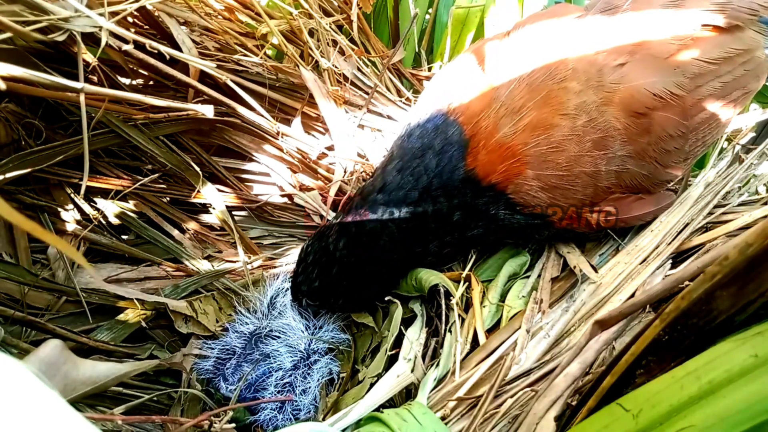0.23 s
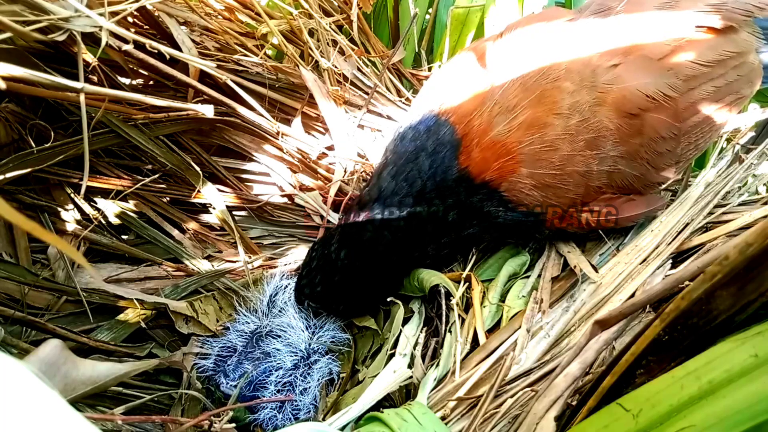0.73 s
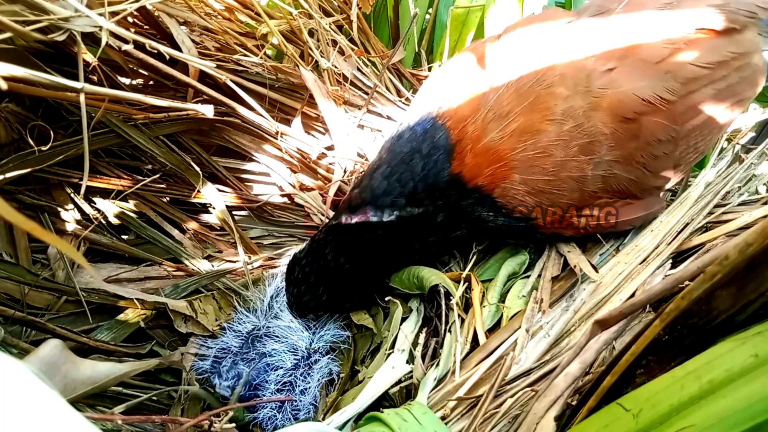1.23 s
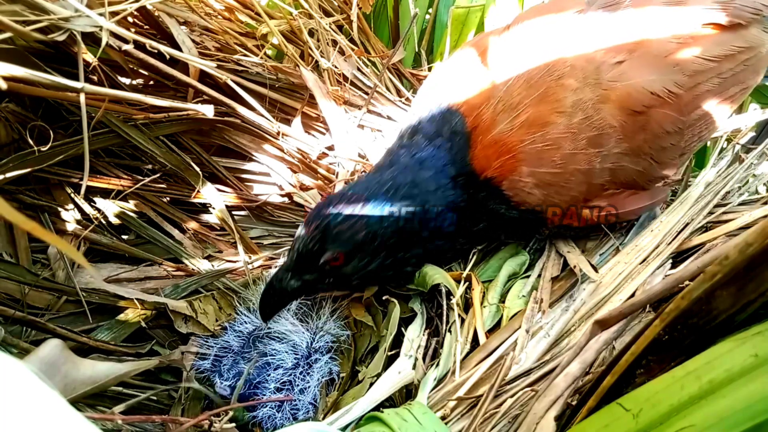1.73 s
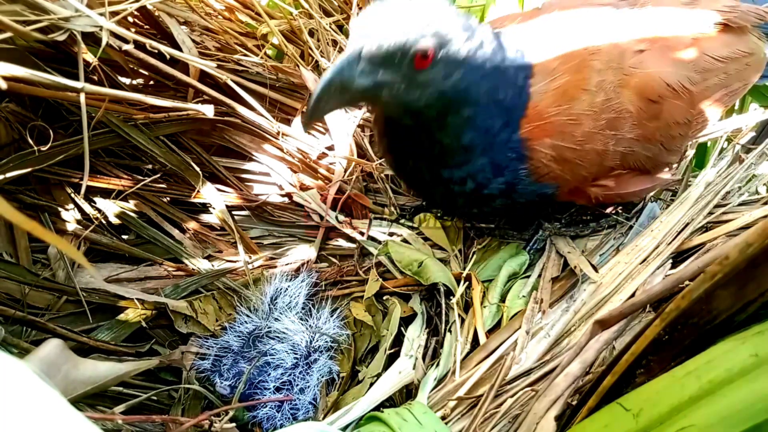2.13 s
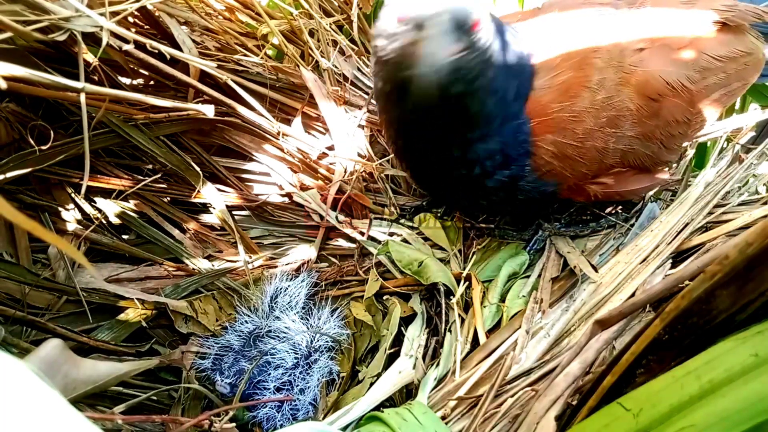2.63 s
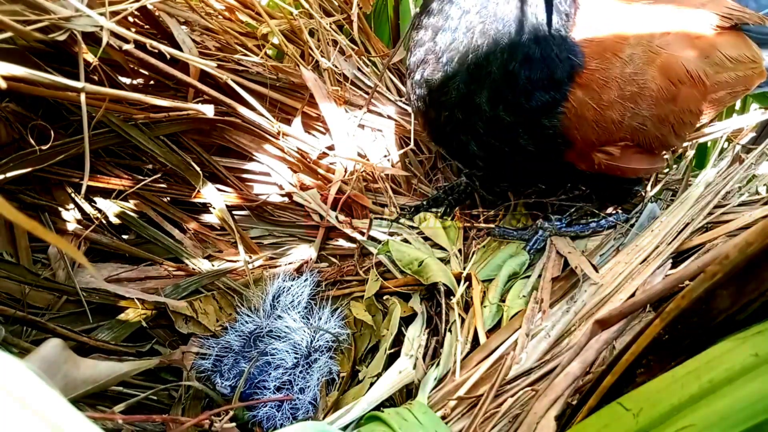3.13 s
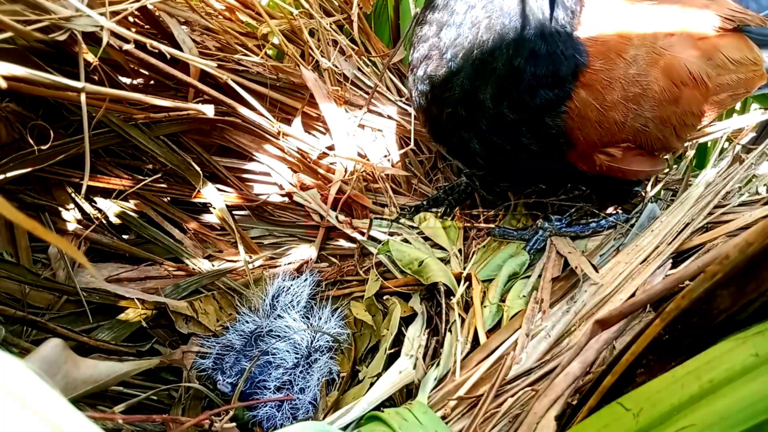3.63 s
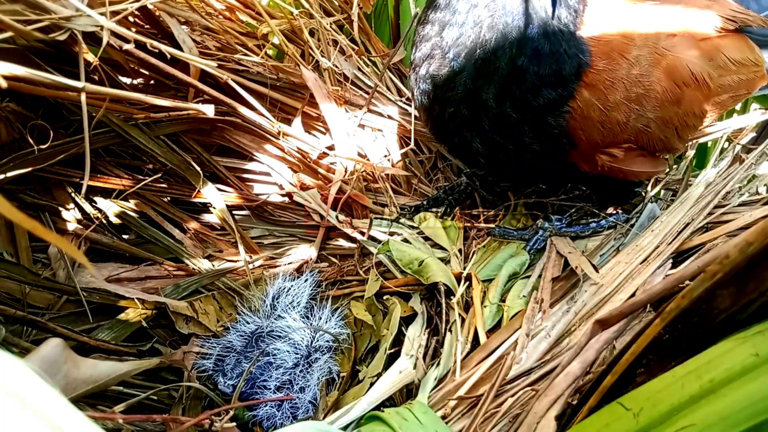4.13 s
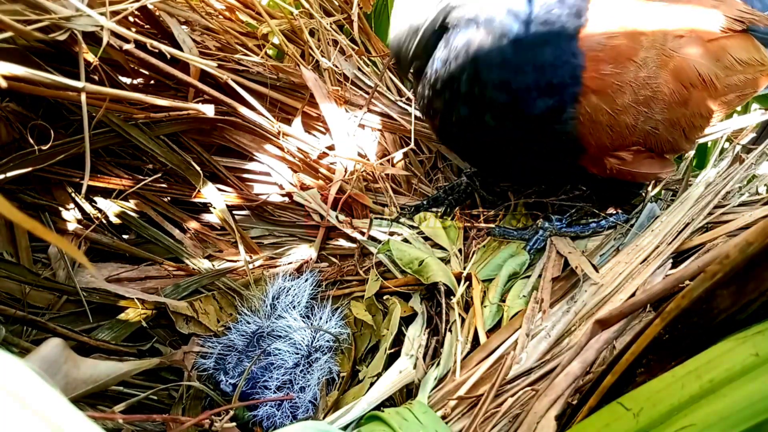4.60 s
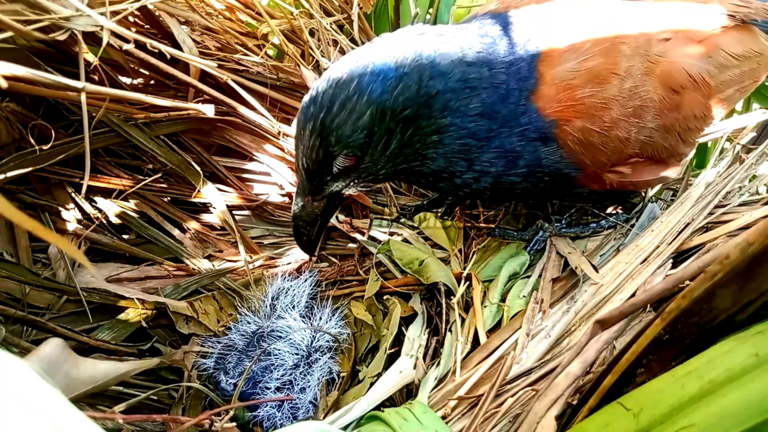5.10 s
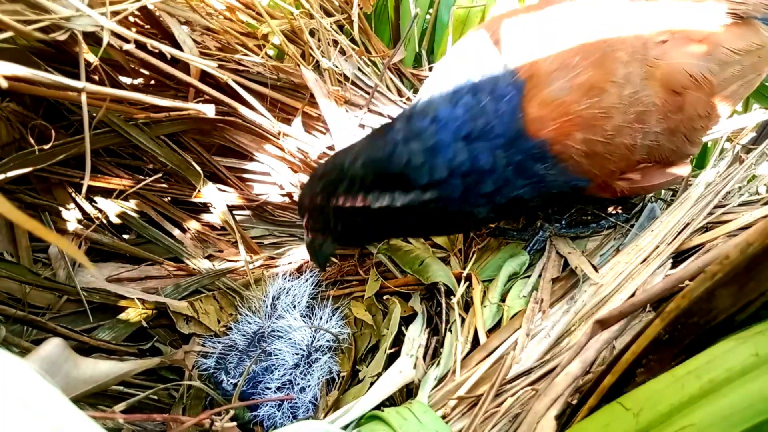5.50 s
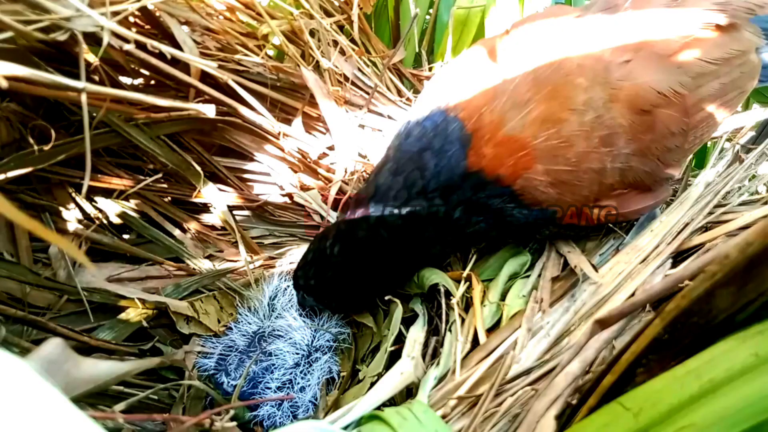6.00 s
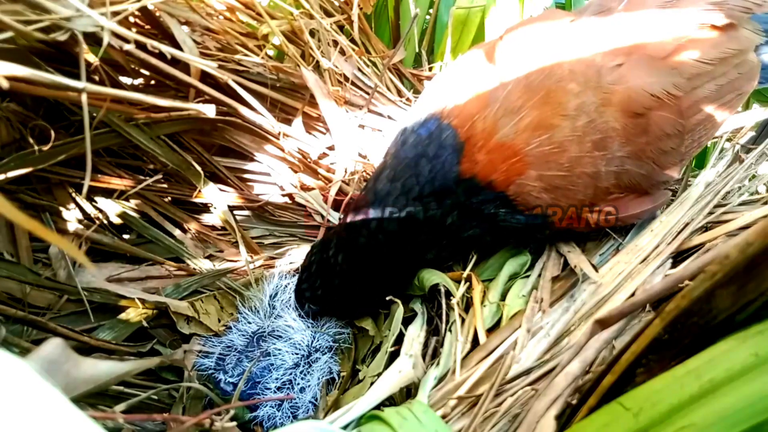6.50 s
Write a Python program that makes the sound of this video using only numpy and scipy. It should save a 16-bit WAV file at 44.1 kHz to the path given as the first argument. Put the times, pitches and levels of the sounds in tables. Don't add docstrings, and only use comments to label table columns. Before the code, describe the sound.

Very near, a chick hisses out about sixteen raspy, evenly spaced begging cries, bright at first then duller and fading, crickets faint behind.

```python
import sys
import numpy as np
from scipy import signal
from scipy.fft import rfft, irfft
from scipy.io import wavfile
from scipy.ndimage import uniform_filter1d

SR = 44100
rng = np.random.default_rng(int(sys.argv[2]) if len(sys.argv) > 2 else 0)


def how_loud(loudness_db):
    steps = np.asarray(loudness_db, float) / 20
    return 10 ** steps


def waveform_to_disk(signal):
    frames = np.transpose(np.atleast_2d(signal))
    scaled = np.clip(frames, -1, 1) * 32767
    samples = np.round(scaled).astype(np.int16)
    wavfile.write(sys.argv[1], SR, samples)


N = 297675

# start_s, lets_go_after_s, shuts_after_s, hiss_db, sag_db_per_s while held
PUSHES = [(0.549, 0.13, 0.17, -82, 10), (0.909, 0.18, 0.29, -67, 81), (1.225, .17, 0.47, -70, 18),
          (1.553, 0.17, 0.29, -23, 22.5), (1.698, 0.18, 0.22, -26, -27), (2.02, 0.28, 0.87, -22.5, 29),
          (2.25, 0.15, 0.18, -21, 40), (2.526, .21, 0.23, -20.5, 47), (2.833, 0.16, .22, -23, 24),
          (3.155, 0.17, 0.22, -22.5, 29.5), (3.48, 0.15, 0.2274, -24, 29.5),
          (3.816, 0.16, 0.246, -26, 37.5), (4.165, 0.18, 0.255, -28, 45.5), (4.51, 0.19, 0.257, -27.5, 42),
          (4.875, 0.22, 0.248, -28, 110), (5.235, 0.19, 0.264, -32.5, 63.5), (5.6, 0.19, 0.219, -38.5, 145),
          (5.958, .1, 0.17, -45.5, 116), (6.071, 0.11, 0.11, -62.5, 44), (6.298, 0.18, 0.229, -54.5, 87)]
# peak_after_s, top_pitch_hz, then fundamental_db, second_db, upper_partials_db re hiss
VOICES = [(0.0389, 700, 6, 18, 13), (0.04766, 755, -12.5, -2.5, -1), (.1, 790, -30, -13, 5),
          (0.0488, 890, -22.5, -34, -19.5), (.14, 820, -25.5, -46, -21), (0.0415, 975, -16.5, -30, -15.5),
          (.06, 935, -23, -27.5, -17), (.08, 950, -17, -25.5, -13.5), (0.062, 870, -26.5, -19, -15.5),
          (0.088, 915, -19, -30, -14.5), (.07, 795, -23, -20.5, -10), (.1, 780, -18, -20, -13),
          (0.044, 875, -24, -18.5, -12.5), (0.039, 795, -22, -14, -9.5), (0.07, 885, -19, -14, -13),
          (0.06, 900, -14, -13.5, -15), (0.05, 765, -14, -8, -10), (0.046, 672, -8, -3, -2.5),
          (0.023, 640, -30, -9, -20), (0.043, 828, -12, -2, -1.5)]


def band_pass(x, hz, width):
    band = signal.butter(2, [hz - width / 2, hz + width / 2], "band", fs=SR, output="sos")
    return signal.sosfilt(band, x)


def shape(x, gain):
    f = np.arange(N // 2 + 1) * SR / N + 1
    y = irfft(rfft(x) * gain(f), N)
    return y / np.std(y)


def lean(x, hz, below_db, above_db):
    below = signal.sosfiltfilt(signal.butter(4, hz, fs=SR, output="sos"), x)
    return how_loud(below_db) * below + how_loud(above_db) * (x - below)


def walk(rate):
    k = int(SR / rate)
    steps = np.repeat(rng.standard_normal(N // k + 1), k)
    y = uniform_filter1d(uniform_filter1d(steps, k), k)[:N]
    return y / np.std(y)


def ease(x):
    return uniform_filter1d(x, 700)


def curve(table, column):
    rows = np.array(table, float)
    return np.interp(np.arange(N) / SR, rows[:, 0], rows[:, column])


def air():
    # pitch_hz, level_db_per_hz
    spectrum = [(20, -35.5), (40, -19.5), (70, -9.5), (130, -18), (350, -27.5), (800, -22.5), (1600, -25.5),
                (4000, -26.5), (6500, -29.5), (8000, -26.5), (9000, -21), (10400, -20), (12000, -32),
                (15500, -37)]
    hz, db = np.transpose(spectrum)
    hiss = shape(rng.standard_normal(N), lambda f: how_loud(np.interp(np.log(f), np.log(hz), db)))
    return how_loud(-76.5 + .8 * walk(2.3)) * hiss


def wind():
    # centre_s, level_db, half_length_s
    gusts = [
        (1.75, -66, 0.11),
        (2.145, -78.5, 0.14),
        (2.68, -68, 0.063),
        (2.937, -84, 0.1),
        (4.119, -73, 0.026),
    ]
    t = np.arange(N) / SR
    rumble = shape(rng.standard_normal(N), lambda f: 1 / (1 + (60 / f) ** 4) / (1 + (f / 150) ** 4))
    level = how_loud(-84.5)
    for at, db, half in gusts:
        level = level + how_loud(db) * np.exp(-((t - at) / half) ** 2)
    return level * rumble


def motor_hum():
    # time_s, level_db before the gate
    hum = [
        (0, -86),
        (.8, -84.5),
        (1.5, -74),
        (1.6, -57),
        (1.78, -51.5),
        (1.83, -95.5),
        (6.75, -99),
    ]
    turn = 2 * np.pi * np.cumsum(100.5 + walk(20)) / SR
    octave = how_loud(-24.5 + 3.94 * walk(24)) * np.sin(2 * turn)
    return how_loud(curve(hum, column=1) + 2) * (np.sin(turn) + octave)


def chirps(count, rate, hz, fall_hz, wide_s):
    # offset_s, level_db
    pulses = [
        (-.014, -22.5),
        (0, 5.5),
        (0.013, 5),
    ]
    out, t = 0, np.arange(N) / SR
    for at, db in pulses:
        since = ((count - at * rate + .5) % 1 - .5) / rate
        sweep = 2 * np.pi * (hz * t - fall_hz * since ** 2 / (2 * wide_s))
        out = out + how_loud(db) * np.exp(-(since / wide_s) ** 2) * np.sin(sweep)
    return out * how_loud(2 * walk(30) + 0.5 * walk(1.5))


def crickets():
    # time_s, chirps_so_far
    near_count = [
        (-.0415, -1),
        (.76, 16),
        (5.148, 109),
        (6.796, 144),
    ]
    # time_s, level_db
    far_level = [
        (0, -63),
        (1.4, -65),
        (3, -65),
        (4.5, -68),
        (6.75, -66),
    ]
    near = how_loud(-63) * chirps(curve(near_count, column=1) - .04, 21.2, 4560, 100, .0036)
    far_count = 20.4 * np.arange(N) / SR + .05 * walk(1.5)
    far = how_loud(curve(far_level, column=1) - 1.5) * chirps(far_count + .1, 20.4, 4640, 80, .005)
    both = near + far
    leaves = rng.standard_normal(2600) * np.exp(-np.arange(2600) / 600) * how_loud(-30.5)
    return both + signal.fftconvolve(both, leaves)[:N]


def far_notes():
    # start_s, end_s, pitch_hz, level_db
    notes_heard = [
        (0.102, 0.81, 2230, -82),
        (3.278, 3.707, 774, -65),
        (2.202, 2.604, 197.3, -80.5),
        (4.75, 5.499, 202.2, -84.5),
        (5.747, 6.347, 2430, -78.5),
        (6.567, 6.802, 2374, -86),
    ]
    out, t = 0, np.arange(N) / SR
    for start, end, hz, db in notes_heard:
        edge = np.clip(np.minimum(t - start, end - t) / 0.023, 0, 1)
        tone = np.sin(2 * np.pi * np.cumsum(hz + 6 * walk(46)) / SR)
        out = out + edge * how_loud(db + 2 * walk(22)) * tone
    return out


def breathing():
    attack_s, attack_power, tail_db_s, shut_db_s = 0.081, 1.68, 297.5, 991
    s, power = np.arange(SR // 2) / SR, np.full(N + SR, how_loud(-200))
    swell = np.sin(np.pi / 2 * np.clip(s / attack_s, 0, 1)) ** (2 * attack_power)
    for start, hold, shut, db, sag in PUSHES:
        fall_db = sag * np.clip(s - attack_s, 0, max(hold - attack_s, 0))
        fall_db += tail_db_s * np.clip(s - hold, 0, None)
        fall_db += shut_db_s * np.clip(s - shut, 0, 1)
        power[int(start * SR):][:len(s)] += swell * how_loud(2 * (db - fall_db))
    return 10 * np.log10(uniform_filter1d(power[:N], 300))


def pitch(push):
    rest_hz, least_fall_hz = 690, 96
    start, hold = np.array(PUSHES)[:, :2].T
    hold = np.minimum(hold, np.diff(start, append=99))[push]
    peak_s, top_hz = np.array(VOICES)[push, :2].T
    s = np.arange(N) / SR - start[push]
    rise = .24 * top_hz * np.clip(1 - s / peak_s, 0, 1) ** 2
    slack = np.clip((s - peak_s) / (hold - peak_s), 0, 1) ** 2.1
    fall = np.maximum(top_hz - rest_hz, least_fall_hz) * slack
    return top_hz - rise - fall, rise, fall, np.clip(s - hold, 0, 1)


def partials(phase, rough, levels_db):
    db1, db2, db_upper = levels_db
    beat = 1 + 1.1 * rough * np.sin(2 * np.pi * np.cumsum(165 + 30 * walk(14)) / SR)
    flutter = beat * how_loud(rough * (4 * walk(70) + 7 * walk(25) - 4))
    voice = how_loud(db1 + 2.5 * walk(22)) * np.sin(phase)
    voice += how_loud(db2 - 9 * rough) * np.sin(2 * phase)
    upper = np.sin(3 * phase) + 1.5 * np.sin(4 * phase) + np.sin(5 * phase) + .8 * np.sin(6 * phase)
    voice += how_loud(db_upper - 14 * rough) * upper
    return flutter * voice


def low_side():
    # start_s, length_s, start_hz, fundamental_db, overtones_db
    sagging = [(.86, .05, 930, -110, -87), (1.454, 0.052, 890, -110, -83), (1.579, 0.14, 738, -51, -58),
               (2.544, 0.1, 714, -87, -49.5), (2.687, 0.08, 760, -57, -54),
               (3.183, 0.053, 699.8, -59.5, -43.5), (3.526, 0.064, 624, -78, -48),
               (3.841, 0.088, 690, -54, -51), (4.181, 0.18, 755, -52.5, -52.5),
               (4.555, 0.12, 727, -50.5, -61), (4.702, 0.055, 530, -52.5, -74),
               (4.928, 0.1, 716, -56.5, -52.5), (5.301, .13, 733, -62, -59)]
    # start_s, fundamental_db, overtones_db
    scooping = [
        (1.563, -69, -60),
        (3.825, -73, -59),
        (4.178, -65, -53),
        (4.521, -75, -50),
        (4.886, -72, -50),
        (5.245, -66, -60),
        (6.312, -85, -69),
    ]
    out, t, waver = 0, np.arange(N) / SR, 1 + .02 * walk(250)
    sags = [(at, long, hz, hz - 633 * long, db1, db) for at, long, hz, db1, db in sagging]
    scoops = [(at, .046, 585, 860, db1, db) for at, db1, db in scooping]
    for start, long, hz0, hz1, db1, over_db in sags + scoops:
        u = np.clip((t - start) / long, 0, 1)
        phase = 2 * np.pi * np.cumsum((hz0 + (hz1 - hz0) * u ** 0.98) * waver) / SR
        over = np.sin(2 * phase) + np.sin(3 * phase) + 0.62 * np.sin(4 * phase)
        swell = np.sqrt(np.abs(np.sin(np.pi * u))) * (u < 1)
        out = out + swell * (how_loud(db1) * np.sin(phase) + how_loud(over_db) * over)
    return np.sqrt(2) * how_loud(3 * walk(70)) * out


def throat(f):
    # pitch_hz, width_hz, level_db
    resonances = [(1300, 220, -28), (1550, 190, -23.5), (2230, 93, -9.5), (2605, 740, -9.5),
                  (3400, 1000, -14.5), (3702, 770, -7.5), (4675, 220, -2), (5240, 750, -9),
                  (5474, 340, -0.5), (6206, 440, -5.5), (6805, 380, -0.5), (7293, 364, 0.5),
                  (7720, 120, 0.5), (7846, 350, 0.5), (8300, 450, -1.5), (8580, 230, -5), (8854, 160, 4.5),
                  (9180, 540, -3), (10100, 450, 0), (10690, 620, -1.5), (10600, 750, -4.5),
                  (12000, 350, -4), (12440, 190, -4), (13000, 280, -35), (12090, 2400, -5.5),
                  (13270, 600, -41.5), (14700, 1000, -34), (15420, 250, -14.5)]
    return np.sqrt(sum(how_loud(2 * db) / (1 + (2 * (f - hz) / w) ** 2) ** 2 for hz, w, db in resonances))


def breath_hiss(phase, push, muffle_db, low_db):
    stretch = [-1, -5, .3, 2, 4.5, 7, 2.5, 0, 0.7, -2.8, -3.5, -3.5, -3, -3, -3.5, -6.5, -2.5, 7, 12.5, 6.5]
    stretch_db = ease(np.array(stretch)[push])
    ripple = (1.6 + 0.14 * np.cos(phase / 2) ** 4) * how_loud(0.5 * walk(900) + 1.2 * walk(40))
    breath = ripple * rng.standard_normal(N)
    low = shape(breath, lambda f: throat(f) / (1 + (f / 5900) ** 40))
    low = lean(low, 3700, 0, -0.51 * (muffle_db - 2.5))
    mid = shape(breath, lambda f: throat(f) / (1 + (5900 / f) ** 40) / (1 + (f / 9650) ** 30))
    mid = lean(mid, 7500, 0.73 * stretch_db, -.4 * stretch_db)
    top = shape(breath, lambda f: throat(f) / (1 + (9650 / f) ** 30))
    top = lean(top, 11500, .4 * stretch_db, -.9 * stretch_db)
    top = lean(top, 13540, 0, -1.0 - .8 * muffle_db)
    top_db = np.maximum(-1.5 - muffle_db, -6.5)
    chest = shape(breath, lambda f: 1 / (1 + (600 / f) ** 6) / (1 + (f / 1000) ** 12)
                  + how_loud(-26.5) / (1 + (f / 700) ** 4))
    return mid + how_loud(top_db) * top + how_loud(low_db + 5.5) * (low + how_loud(-39.5) * chest)


def nestling():
    roughness = [(.3, .6), (.5, .55), (.7, .7), (.25, .35), (.35, .33), (.55, .16), (.16, .16), (.4, .36),
                 (.25, .25), (.4, .22), (.5, .6), (.5, .5), (.5, .5), (.5, .5), (.5, .45), (.15, .55),
                 (.15, .45), (.4, .5), (.7, .7), (.2, .55)]
    muffle = [24, 24.4, 21.4, 2.3, 4, .2, 0.11, .2, .2, 3.1, 3.9, 6.2, 7.1, 6.1, 8.3, 8.5, 8.4, 8.8, 17,
              22.2]
    rows, hiss_db = np.array(PUSHES), breathing()
    push = np.maximum(np.searchsorted(rows[:, 0], np.arange(N) / SR) - 1, 0)
    on = 1. * (hiss_db > -98)
    hz, rise_hz, fall_hz, rested_s = pitch(push)

    scoop_loss_db, slack_loss_db = (11.5, 4, 3.5), (4, 0.5, 1.5)
    levels_db = []
    for k in range(3):
        loss_db = (scoop_loss_db[k] * rise_hz + slack_loss_db[k] * fall_hz) / 100
        loss_db = loss_db + 358.5 * rested_s
        levels_db.append(hiss_db + ease(np.array(VOICES)[push, 2 + k] - loss_db))

    marks = []
    for call, (onset, body) in zip(PUSHES, roughness):
        marks += [(call[0] + .045, onset), (call[0] + .095, body), (call[0] + .14, body)]
    rough = curve(marks, column=1)
    jitter = rough * (.06 * walk(300) + .02 * walk(50))
    phase = 2 * np.pi * np.cumsum(ease(hz) * (1 + jitter)) / SR
    voice = np.sqrt(2) * on * partials(phase, rough, levels_db) + low_side()
    small = signal.butter(6, 520, "high", fs=SR, output="sos")
    voice = signal.sosfilt(small, voice)

    muffle_db = ease(np.array(muffle)[push])
    low_db = -15 + muffle_db + 0.074 * (ease(rows[push, 3]) - hiss_db)
    hiss = how_loud(hiss_db) * breath_hiss(phase, push, muffle_db, low_db)
    effort_db = np.maximum(hiss_db, hiss_db + low_db - 6.5)
    return voice + on * hiss, np.where(on > 0, effort_db, -99)


def straw_ticks():
    # time_s, peak_db, pitch_hz
    ticks = [
        (1.1454, -43, 8700),
        (1.3384, -41, 8460),
        (1.45, -44, 8840),
    ]
    out, t = 0, np.arange(N) / SR
    for at, db, hz in ticks:
        snap = (t > at) * np.exp(-np.abs(t - at) / 0.0014) * rng.standard_normal(N)
        out = out + how_loud(db - 7) * band_pass(snap, hz, 3500)
    return out


def scene():
    behind = air() + wind() + motor_hum() + crickets() + far_notes() + straw_ticks()
    bird, effort_db = nestling()
    opens_db, slope, range_db = -67.5, 0.37, 29.5
    gate_db = ease(np.clip(slope * (effort_db - opens_db), 0, range_db))
    mono = bird + how_loud(gate_db) * behind
    return np.array([mono, mono])


def top_cut(x):
    return signal.sosfilt(signal.butter(12, 15710, fs=SR, output="sos"), x)


def record(dry):
    cut = signal.ellip(10, .2, 80, 15560, fs=SR, output="sos")
    mix = signal.sosfilt(cut, dry)
    return top_cut(mix)


dry = scene()
out = record(dry)
waveform_to_disk(out)
```